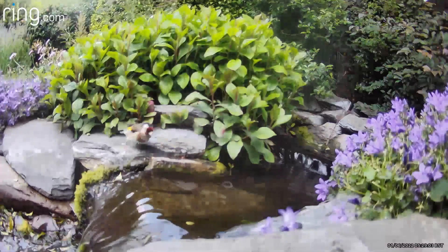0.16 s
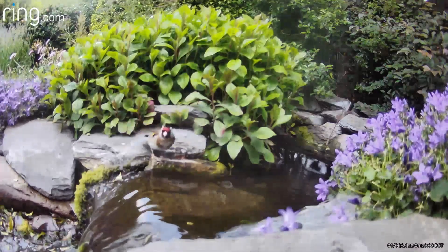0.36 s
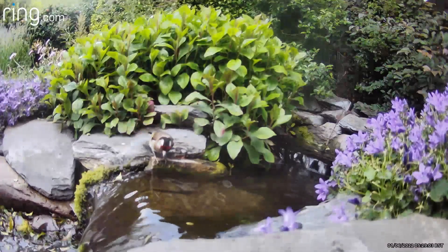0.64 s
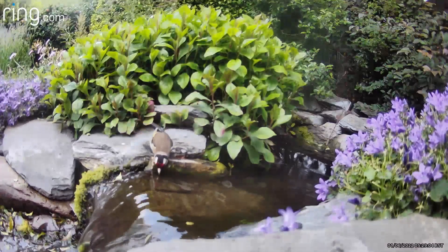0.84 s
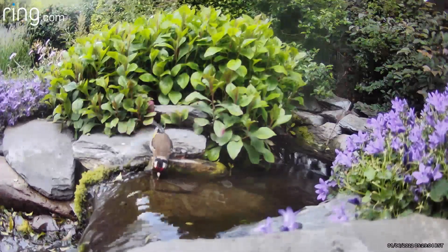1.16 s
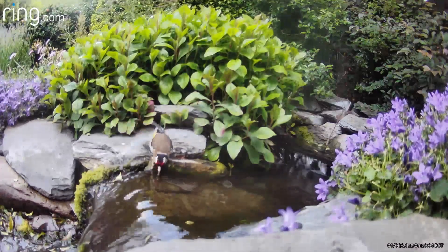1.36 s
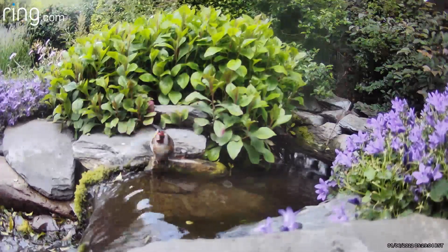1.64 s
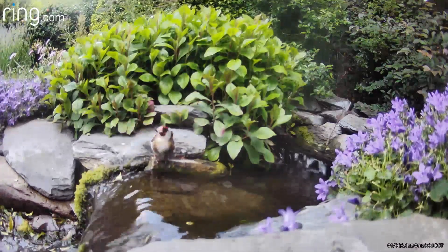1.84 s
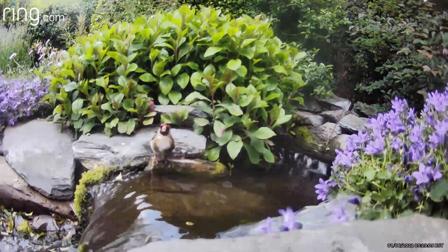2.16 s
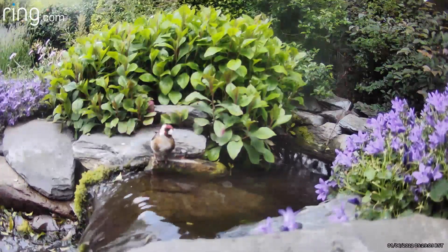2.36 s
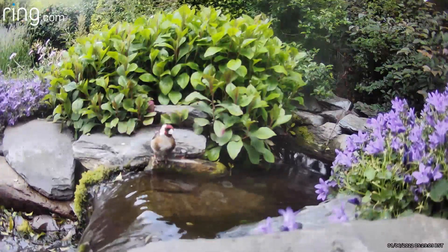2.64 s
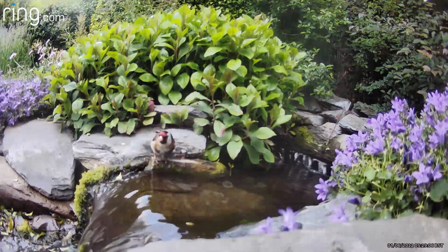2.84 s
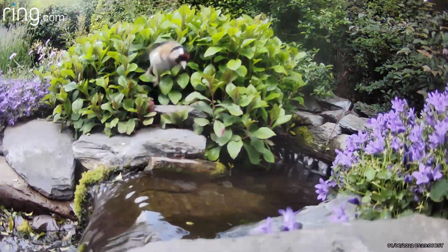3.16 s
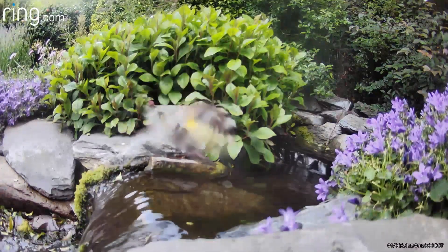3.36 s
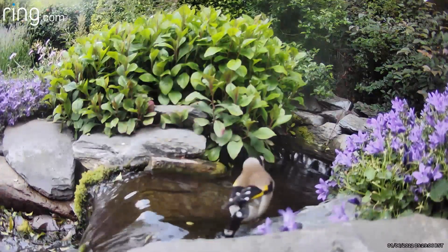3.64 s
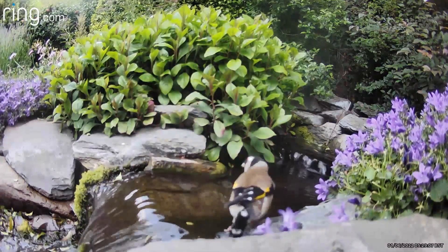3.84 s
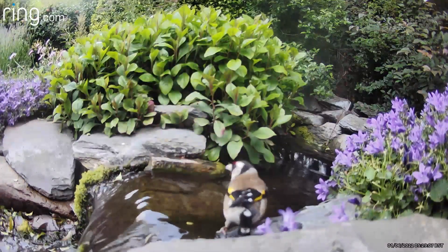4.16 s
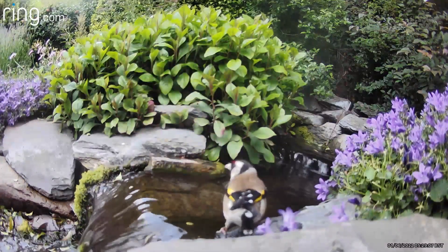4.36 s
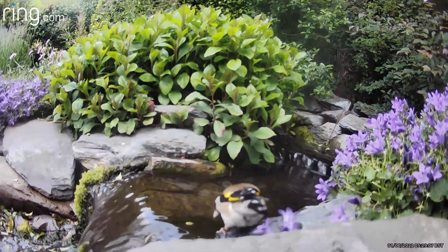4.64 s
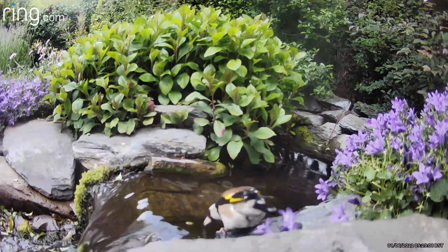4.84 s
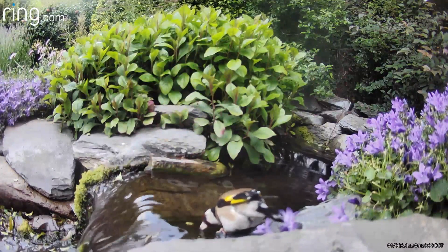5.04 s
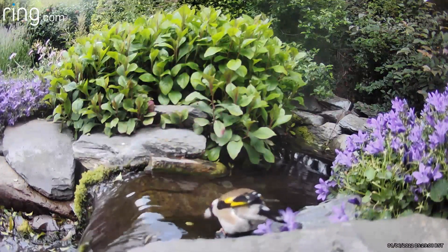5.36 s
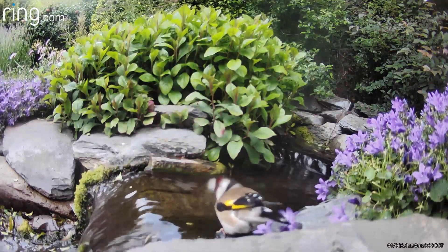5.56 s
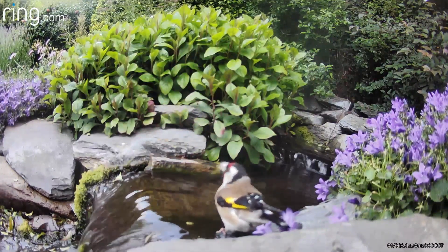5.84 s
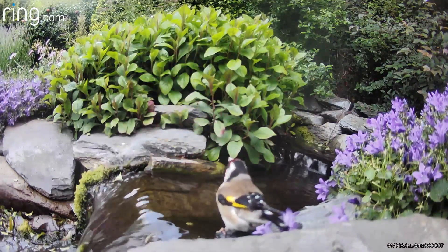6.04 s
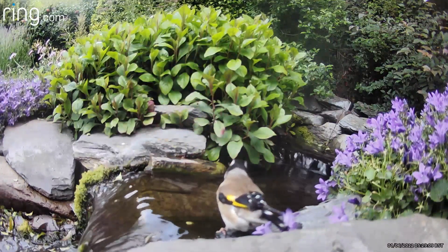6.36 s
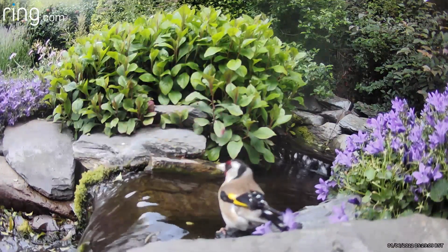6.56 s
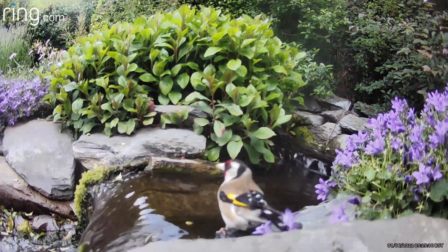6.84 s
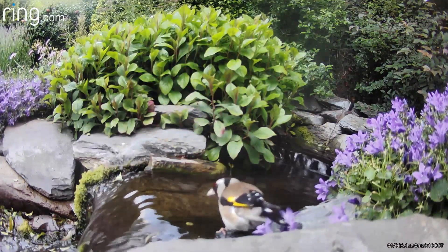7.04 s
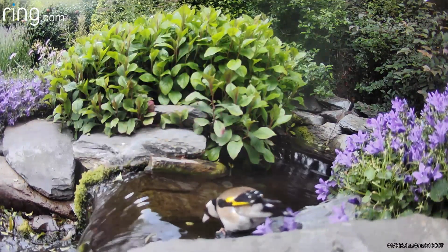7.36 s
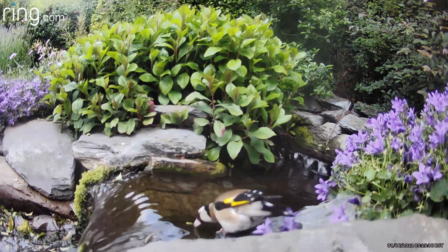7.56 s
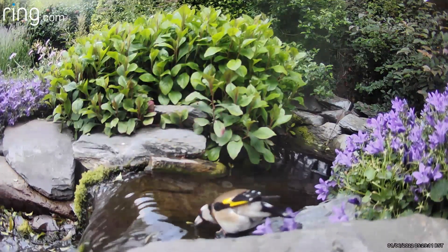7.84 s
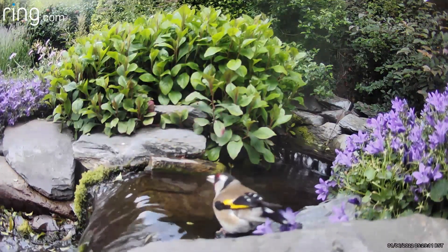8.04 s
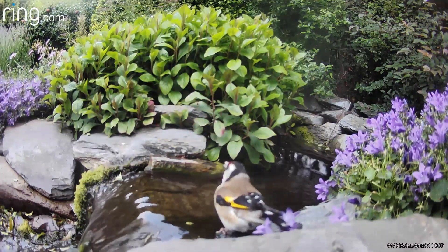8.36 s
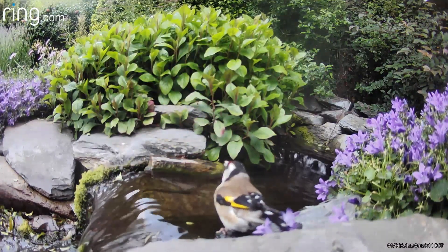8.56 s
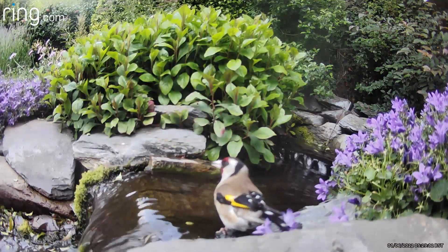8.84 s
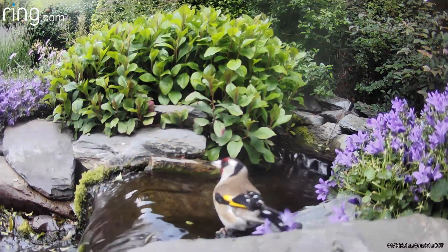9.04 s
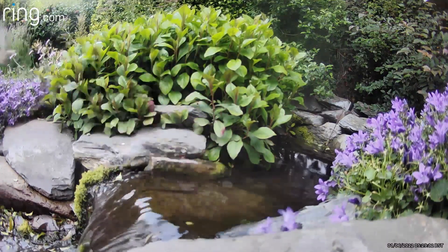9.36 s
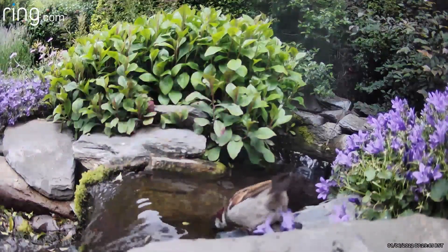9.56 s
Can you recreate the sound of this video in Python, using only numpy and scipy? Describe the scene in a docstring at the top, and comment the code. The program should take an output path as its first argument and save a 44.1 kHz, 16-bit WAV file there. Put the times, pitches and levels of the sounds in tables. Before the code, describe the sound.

Water gushes over stones into a small garden pond, bright and splashy with ringing bubbles; this is the loudest moment. By about 0.5 seconds it settles into a much quieter, steady trickle, a patter of small bubbles and fine spray with irregular plinking drops standing out. A pump hums very faintly underneath. Short, faint, high peeps mix with the drops, around 1 second, between 5 and 6 seconds and again near 7. At about 3.3 seconds a small bird flies in with a few soft, low wing thumps. A second, slightly stronger flutter comes from 9.2 to 9.5 seconds. Just before 9.5 seconds the water cuts off abruptly into a brief hiss, followed by quieter air and a few tiny, crisp rustles of a bird very close to the microphone, ending at about 9.7 seconds.

```python
"""Water gushes over stones into a small garden pond, each trapped air bubble ringing for a moment.
Within half a second it settles to a patter of bubbles, splashing drops and short peeps, over the hum
of the pump. Small birds fly in with soft thumps of their wings, after about 3 seconds and again after 9.
Then the pond cuts off, leaving a brief loud hiss, quiet air and a few close rustles."""
import sys
import numpy as np
from scipy import signal
from scipy.fft import rfft, irfft, next_fast_len
from scipy.io import wavfile
from scipy.ndimage import uniform_filter1d, map_coordinates

SR = 44100
rng = np.random.default_rng(int(sys.argv[2]) if len(sys.argv) > 2 else 0)


def put_to_file(sound):
    """Save the sound as 16-bit audio at rate SR, in the file named by the first command-line argument."""
    columns = np.atleast_2d(sound).T  # one column per channel
    safe = np.clip(columns, -1, 1)
    whole_steps = np.round(safe * 32767)
    wavfile.write(sys.argv[1], SR, whole_steps.astype(np.int16))


N = 427329

# Drops loud enough to stand out: peak_s, peak_db, pitch_hz, width_cycles, splash_db
DROPS = [(0.003, -25, 2320, 5.7, -51), (0.01, -20.5, 4630, 4, -39), (0.0191, -16.5, 4830, 3.6, -39),
         (0.046, -33, 4020, 3, -46), (0.068, -23.5, 2380, 6, -44), (0.0687, -22, 4460, 7.4, -40.5),
         (0.092, -21.5, 5960, 3.9, -32.5), (0.1089, -27, 2070, 7.3, -35.5), (0.118, -24.5, 4140, 10.5, -40),
         (0.129, -21.5, 5780, 9.2, -41), (0.1536, -26, 1860, 3.3, -37.5), (0.1664, -19.5, 5100, 6.6, -52),
         (0.2214, -22, 2200, 2.2, -38), (0.2353, -27, 2000, 3.6, -36.5), (0.236, -27, 2950, 8.3, -41),
         (0.246, -31, 900, 3.3, -45), (0.2678, -28, 5380, 13, -34.5), (0.3049, -28, 3100, 4.1, -39),
         (0.311, -35, 730, 3.7, -53), (0.3383, -26, 1580, 2.3, -44), (0.3514, -28.5, 940, 4.9, -58),
         (0.3594, -28, 1340, 4.1, -50), (0.3783, -34.5, 2130, 10, -50), (0.447, -31.5, 2550, 5.1, -43),
         (0.505, -41.5, 790, 3.3, -51.5), (0.795, -37, 4970, 3, -62), (0.8494, -49, 726, 4.6, -57),
         (0.881, -36.5, 3830, 4.1, -50.5), (0.9545, -28, 3900, 3.2, -54), (1.0, -42, 1950, 4, -55),
         (1.085, -49, 4300, 4, -59), (1.2013, -32.5, 4180, 2.9, -49), (1.218, -34.5, 4270, 6.1, -53),
         (1.357, -36.5, 3820, 7.3, -54), (1.361, -37, 4960, 6.4, -61), (1.6585, -32.5, 7100, 2, -57),
         (1.888, -42, 3170, 2.6, -64), (2.146, -40, 5740, 6.5, -51), (2.158, -41, 2900, 3, -48),
         (2.187, -35.5, 4020, 5.4, -62), (2.2547, -39, 2300, 6.2, -52), (2.309, -34, 4500, 2.4, -62),
         (2.3949, -31.5, 2720, 3.7, -52), (2.432, -31.5, 4700, 3.4, -55), (2.4374, -35, 4250, 7.9, -49),
         (2.4487, -35, 4900, 7.6, -61), (2.47, -40, 2380, 11, -58), (2.471, -36, 4820, 7.5, -67),
         (2.5346, -32.5, 4500, 3, -60), (2.555, -35, 3900, 4.3, -54), (2.62, -30.5, 3380, 3, -44.5),
         (2.8346, -47, 1300, 3.0, -57), (2.862, -40.5, 4700, 9.2, -64), (2.9825, -36, 4220, 6.2, -53),
         (3.066, -30.5, 4080, 3.4, -48.5), (3.139, -44, 2780, 4, -62), (3.22, -50, 920, 2.3, -60),
         (3.27, -47, 4300, 4, -44), (3.3055, -29, 2460, 3.7, -50), (3.308, -29, 4600, 3.3, -55.5),
         (3.548, -43, 4430, 3, -49.5), (3.578, -38, 2600, 4, -57), (3.7767, -36, 1770, 5.6, -48),
         (3.9983, -37.5, 1840, 2.9, -54), (4.0346, -32.5, 6400, 4.5, -60), (4.1397, -31.5, 4580, 13, -45.5),
         (4.157, -46, 3680, 7.9, -46), (4.335, -46, 4460, 4, -46.5), (4.379, -42, 2400, 4, -57),
         (4.418, -31, 4470, 5, -55), (4.4453, -48, 870, 3.3, -57), (4.5495, -31.5, 3980, 2.8, -62),
         (4.5772, -25.5, 4030, 1.7, -61), (4.5928, -48, 760, 5, -56), (4.594, -36.5, 5740, 5.4, -61),
         (4.84, -38, 4600, 4, -49.5), (4.8666, -26.5, 4000, 4.5, -64), (4.9252, -35.5, 4480, 5.8, -49),
         (4.9906, -27.5, 4520, 3.3, -60), (5.0091, -37, 4360, 5.9, -66), (5.073, -38, 1000, 2.4, -53),
         (5.123, -31, 4240, 3.1, -52), (5.215, -48, 533, 1.6, -68), (5.2796, -25, 4960, 4.4, -58),
         (5.475, -42, 2940, 4, -54), (5.5196, -30.5, 2400, 3.3, -60), (5.62, -40, 2700, 3.6, -55),
         (5.665, -39, 2400, 4, -56), (5.775, -40, 3540, 4, -56), (5.899, -38, 3800, 4.8, -48.5),
         (5.998, -29.5, 3850, 3.2, -45), (6.0616, -34.5, 2500, 5, -49), (6.0985, -27.5, 3660, 1.2, -46.5),
         (6.155, -36, 6600, 6.1, -52), (6.27, -40, 2960, 4, -60), (6.3248, -51, 716, 5.1, -55),
         (6.5, -40.5, 3020, 2.5, -61), (6.606, -41, 5630, 3, -42), (6.69, -41, 2800, 5, -53),
         (6.7795, -30.5, 4480, 1.8, -48), (6.795, -40, 4200, 8.7, -43), (6.8205, -40, 4840, 4.4, -64),
         (6.848, -32.5, 3980, 2.6, -59), (6.885, -30.5, 4340, 3.2, -57), (7.014, -39.5, 2700, 2.2, -63),
         (7.069, -39, 1500, 1.5, -46), (7.202, -26.5, 3800, 2.5, -51), (7.375, -38.5, 1060, 1.25, -64),
         (7.616, -32.5, 3420, 6.4, -51), (7.709, -39, 6900, 6.1, -61), (7.77, -38, 2670, 2.5, -51),
         (7.852, -46, 3970, 3, -44.5), (7.914, -41, 2630, 4.5, -50), (7.9478, -31.5, 4630, 5.3, -54),
         (8.1049, -46.5, 985, 5.1, -59), (8.217, -36.5, 3855, 5.6, -62), (8.2368, -36.5, 5430, 9, -49),
         (8.2566, -31.5, 5840, 5.4, -58), (8.273, -40, 1900, 2, -50), (8.2997, -22.5, 3500, 3.1, -50),
         (8.347, -37, 4640, 5, -47.5), (8.414, -32.5, 3920, 5.4, -48), (8.4215, -36, 3800, 4, -60),
         (8.4402, -32.5, 2200, 1.3, -51), (8.683, -37, 4730, 10, -58), (8.8105, -32.5, 5200, 4.1, -47.5),
         (8.8836, -36, 2370, 4.3, -57), (8.892, -49, 740, 3.7, -76), (8.9378, -32.5, 2880, 3, -47.5),
         (8.9705, -25, 5090, 4.5, -43), (9.0091, -36, 1590, 2.9, -48.5), (9.017, -37, 2210, 3, -57),
         (9.069, -40, 4300, 3, -57), (9.09, -39, 4670, 4, -60), (9.107, -40, 4030, 4, -46),
         (9.13, -51, 850, 3.5, -59), (9.293, -46, 840, 1.9, -56), (9.306, -29.5, 5200, 3.9, -45.5),
         (9.336, -26, 3920, 3.3, -51), (9.389, -40, 3750, 18, -47.5)]


def amp(db):
    """Turn decibels into a gain."""
    return 10 ** (np.asarray(db) / 20)


def unit(x):
    """Scale a sound to an average power of 1."""
    return x / np.sqrt(np.mean(x ** 2) + 1e-20)


def curves(rows):
    """Join the rows of a table with lines: one curve for each column after the time."""
    times, *columns = np.transpose(rows)
    return [np.interp(np.arange(N) / SR, times, column) for column in columns]


def wobble(rate):
    """A smooth curve through `rate` random points a second."""
    points = rng.standard_normal(int(N * rate / SR) + 4)
    return map_coordinates(points, [np.arange(N) * rate / SR])


def filtered(x, response):
    """Turn each frequency up or down by the gain response(hz)."""
    size = next_fast_len(N + 8192)
    return irfft(rfft(x, size) * response(np.fft.rfftfreq(size, 1 / SR)), size)[..., :N]


def noise(spectrum, patchy_db):
    """Noise with the given tone, made louder and softer in random patches of time and pitch."""
    grid = signal.stft(rng.standard_normal(N), nperseg=256)[2]
    patches = uniform_filter1d(rng.standard_normal(grid.shape), size=5, axis=0)
    patches = uniform_filter1d(patches, size=7, axis=1)
    patchy = signal.istft(grid * amp(patchy_db * unit(patches)), nperseg=256)[1][:N]
    band_hz, db = np.transpose(spectrum)
    return unit(filtered(patchy, lambda hz: amp(np.interp(np.log(hz + 1), np.log(band_hz), db))))


def bubbles(peak_s, gain, hz, cycles, rise, size, swell=0.3, fade=0.42):
    """Short tones that swell and fade; `rise` lifts the pitch, as when a bubble nears the surface."""
    lead = size // 4
    u = (np.arange(size) - lead) / SR * (hz / cycles)[:, None]  # time from the peak, in widths
    shape = np.where(u < 0, amp(-6 * (u / swell) ** 2), amp(-6 * (np.abs(u) / fade) ** 1.1))
    phase = 2 * np.pi * cycles[:, None] * (u + rise * u * np.abs(u) / 2)
    wave = gain[:, None] * shape * np.sin(phase)
    at = np.round(peak_s * SR).astype(int)[:, None] + np.arange(size)
    return np.bincount(at.ravel(), wave.ravel(), N + 2 * size)[lead:][:N]


def stones(x, fade_s, echo_db, count=24):
    """Rocks round the pond scatter the sound into a short echo, a new one for each stretch of time."""
    t = np.arange(SR // 10) / SR
    tails = rng.standard_normal((count, len(t))) * amp(-60 * t / fade_s)
    parts = np.pad(x, (0, -N % count)).reshape(count, -1)
    echoes = signal.fftconvolve(parts, tails / np.linalg.norm(tails, axis=1)[:, None], axes=1)
    at = np.arange(count)[:, None] * parts.shape[1] + np.arange(echoes.shape[1])
    return x + amp(echo_db) * np.bincount(at.ravel(), echoes.ravel())[:N]


def pump():
    """The pump gives an unsteady electric hum over a dull rumble."""
    # Loudness of the pump: time_s, level_db
    loudness = [(0.0, -90), (0.13, -105), (0.5, -80.5), (0.8, -74), (1.7, -77), (3.0, -80), (3.5, -82),
                (4.4, -80.5), (4.9, -78), (5.3, -79.5), (7.4, -80.5), (8.2, -79.5), (9.0, -79.5),
                (9.47, -76)]
    # Tones of the hum: pitch_hz, relative_db
    tones = [(100, 0.5), (150, -4.5)]
    # Tone of the rumble: frequency_hz, relative_db
    rumble_tone = [(12, -52), (20, -16), (48, -16), (91, -9.5), (193, -6.5), (279, -4.5), (420, -2),
                   (550, -30), (920, -120)]
    level_db, = curves(loudness)
    t = np.arange(N) / SR
    hum = np.zeros(N)
    for hz, db in tones:
        gain = amp(db + 1.3 * wobble(4.9) + 2.2 * wobble(40))
        hum += gain * np.sin(2 * np.pi * hz * t + .3 * wobble(6.5))
    rumble = amp(4.5 + 1.3 * wobble(7)) * noise(rumble_tone, patchy_db=3.0)
    return amp(level_db) * (hum + rumble)


def close_air():
    """Air hisses and a bird rustles very close by, in tiny bright crackles."""
    # Loudness of the hiss: time_s, level_db
    loudness = [(9.43, -48.5), (9.468, -46.5), (9.48, -62.5), (9.642, -61.5), (9.648, -52.5),
                (9.654, -59.5), (9.69, -55)]
    # Tone of the hiss: frequency_hz, relative_db
    hiss_tone = [(15, -30), (25, -3), (94, -10), (153, -5), (242, -16), (300, -7), (773, -8.5), (5120, -6),
                 (7890, -4), (15900, -11.5)]
    # The bird's rustles: start_s, level_db, pitch_hz
    rustles = [(9.44, -41, 7600), (9.613, -55, 7700), (9.628, -52.5, 9900), (9.647, -40, 2680),
               (9.677, -38.5, 9600)]
    level_db, = curves(loudness)
    out = amp(level_db + 2.1 * wobble(60)) * noise(hiss_tone, patchy_db=-3.5)
    t = np.arange(SR // 50) / SR
    for start_s, db, hz in rustles:
        crackle = np.diff(rng.standard_normal(len(t) + 1)) / 2 + np.sin(2 * np.pi * hz * t)
        burst = amp(db - 60 * t / 0.0053) * crackle
        start = round(start_s * SR)
        out[start:][:len(t)] += burst[:N - start]
    return out


def wings():
    """Each wing beat is a soft, low push of air with a puff of feather noise."""
    # Wing beats: peak_s, peak_db, pitch_hz
    beats = [(3.316, -64, 315), (3.365, -62, 194), (3.415, -60, 330), (3.44, -67, 45), (9.216, -60, 148),
             (9.274, -60, 53.8), (9.297, -50.5, 318), (9.336, -53, 218), (9.385, -72, 310),
             (9.437, -65, 203), (9.456, -68, 35.0)]
    # Tone of the feather noise: frequency_hz, relative_db
    feather_tone = [(20, -8), (60, -3), (300, 3), (500, -4), (1000, -62)]
    puff_db, puff_s = -8.5, 0.013  # level against the push, width
    peak_s, db, hz = np.transpose(beats)
    t = np.arange(N) / SR
    pushes = bubbles(peak_s, amp(db), hz, cycles=0.39 + hz * 0.0061, rise=0, size=8000)
    puffs = sum(amp(level + puff_db) * np.exp(-((t - at) / puff_s) ** 2) for at, level in zip(peak_s, db))
    return pushes + puffs * noise(feather_tone, patchy_db=3.5)


def peeps():
    """Short, rough peeps among the drops: soft-edged tones that waver and slide a little."""
    # Peeps: middle_s, level_db, pitch_hz, length_s, glide_hz
    notes = [(0.376, -49, 2100, .014, 101), (0.972, -51, 4600, 0.038, -5), (1.092, -50, 5360, 0.022, 102),
             (1.145, -48, 2390, 0.0087, 0), (1.665, -52, 4830, 0.021, 89), (5.087, -43.5, 5380, 0.032, 150),
             (5.287, -47.5, 5970, 0.024, 10), (5.358, -43, 5040, 0.02, 120), (5.596, -55, 5840, 0.044, 3),
             (5.672, -54.5, 4820, 0.024, -1), (6.781, -57, 5760, 0.017, 6), (7.215, -52, 4740, 0.016, -8),
             (7.268, -54, 5230, 0.023, -2), (7.348, -50.5, 2380, 0.047, 0), (7.922, -54, 2500, 0.026, -3),
             (9.224, -60.5, 527, 0.041, 59), (9.398, -51, 4190, 0.019, 397)]
    out = np.zeros(N)
    for middle_s, db, hz, length_s, glide_hz in notes:
        u = np.linspace(-1, 1, round(2 * length_s * SR))
        waver_hz = 90 * unit(uniform_filter1d(rng.standard_normal(len(u)), size=90))
        phase = 2 * np.pi * np.cumsum(hz + glide_hz * u + waver_hz) / SR
        out[round((middle_s - length_s) * SR):][:len(u)] += amp(db) * np.exp(-(2 * u) ** 4) * np.sin(phase)
    out *= amp(3.3 * wobble(300))  # the tone flutters
    return stones(out, fade_s=0.032, echo_db=-2.5)


def spray(small_db):
    """A fine spray hisses high up, following the level of the small bubbles."""
    # Tone of the spray: frequency_hz, relative_db
    spray_tone = [(4500, -40), (6000, -6.5), (7200, -3), (8200, -9), (8600, -60.5)]
    return amp(uniform_filter1d(small_db, size=3000) - 19) * noise(spray_tone, patchy_db=7.0)


def spatter(small_db):
    """Droplets hit wet stone, 220 a second: ticks too short to have a clear pitch."""
    when, strength, pitch = rng.random((int(220 * N / SR), 3)).T
    gain = amp(np.minimum(-4.5 * np.log(strength + 1e-9), 11))
    ticks = bubbles(when * N / SR, gain, 1800 + 3500 * pitch, np.full(len(when), 1.1), rise=0, size=200)
    level_db = np.minimum(small_db + 2, -48)  # even the gush throws no harder droplets
    return amp(level_db) * stones(ticks, fade_s=0.016, echo_db=-3.5)


def splash_power(hz):
    """How strongly the loud drops stir up bubbles near this pitch: suddenly, then dying away."""
    rise_s, fade_s, stir_db = 0.028, 0.27, -3.6
    lead_s = 0.0047  # the water stirs just ahead of the loud bubble
    peak_s, _, pitch_hz, _, splash_db = np.transpose(DROPS)
    nearness = np.exp(-(np.log(pitch_hz / hz) / 0.71) ** 2)
    starts = np.round(np.maximum(peak_s - lead_s, 0) * SR).astype(int)
    kicks = np.bincount(starts, nearness * amp(splash_db + stir_db) ** 2, N)
    t = np.arange(SR // 4) / SR
    shape = (1 - np.exp(-t / rise_s)) * amp(-60 * t / fade_s)
    return np.abs(signal.fftconvolve(kicks, shape ** 2)[:N])


def patter(hz, spread, rate, extra_cycles, swarm_db, spectrum):
    """Bubbles of one size: a few loud, many faint, over a wash of those too dense to tell apart."""
    when, strength, ring, tuning = rng.random((int(rate * N / SR), 4)).T
    pitch_hz = hz * np.exp(spread * (2 * tuning - 1))
    band_hz, db = np.transpose(spectrum)
    tone_db = np.interp(np.log(pitch_hz), np.log(band_hz), db)
    gain = amp(np.minimum(-5.5 * np.log(strength + 1e-9), 14) + tone_db)
    cycles = 1.87 + extra_cycles * ring ** 4  # most die fast, a few ring on
    swarm = bubbles(when * N / SR, gain, pitch_hz, cycles, rise=.05, size=int(40 * SR / hz))
    swarm = amp(swarm_db) * unit(stones(swarm, fade_s=0.05, echo_db=-1.5))
    wash = noise(spectrum, patchy_db=3.0)
    return unit((swarm + wash) * amp(1.93 * wobble(45)))


def trickle():
    """Running water makes three sizes of bubble, which swell with the flow and with each splash."""
    # Steady flow by bubble size: time_s, large_db, middle_db, small_db
    flow = [(0.0, -80, -33, -41), (0.03, -73, -34.5, -35), (0.058, -69, -39, -41),
            (0.075, -69, -32.5, -32.5), (0.12, -65, -34.5, -40), (0.14, -59, -38, -45),
            (0.156, -58, -34, -30.5), (0.18, -52, -42, -43), (0.215, -51.5, -37.5, -36),
            (0.24, -51, -42, -34.5), (0.258, -60, -49, -38.5), (0.29, -44, -35.5, -36),
            (0.35, -52, -40.5, -39.5), (0.41, -61, -45.5, -52), (0.56, -62, -57, -57.5),
            (0.86, -56.5, -58, -57.5), (1.02, -67, -56, -56.5), (1.39, -63, -62, -53),
            (1.46, -66.5, -64, -64.5), (1.6, -61.5, -63, -55.5), (1.64, -63, -67, -59.5),
            (1.8, -62.5, -60.5, -59.5), (1.9, -59.5, -57.5, -59), (2.16, -67, -62.5, -55.5),
            (2.22, -67.5, -62.5, -55.5), (2.6, -65.5, -52, -54.5), (2.72, -62, -59, -59),
            (2.8, -66, -53, -57), (3.0, -66, -64.5, -55), (3.28, -60, -54, -53), (3.7, -65.5, -60, -60.5),
            (4.1, -66, -55, -53.5), (4.28, -68.5, -60.5, -56.5), (4.45, -62.5, -52, -54.5),
            (4.7, -66, -58, -59), (5.4, -64.5, -56, -53.5), (5.9, -66, -59, -59), (6.22, -65.5, -58, -55),
            (6.55, -66, -57, -59), (7.0, -65.5, -60.5, -57.5), (7.36, -69.5, -58, -55.5),
            (7.5, -67.5, -57.5, -59), (7.76, -66.5, -57.5, -55.5), (7.84, -74, -56.5, -59),
            (7.9, -65, -56, -55), (8.75, -65.5, -59, -58.5), (9.47, -69, -60.5, -60)]
    # Large, middle, small bubbles: pitch_hz, log_pitch_spread, bubbles_per_s, extra_cycles, swarm_db
    sizes = [(749, 0.55, 500, 3.5, -2), (2170, 0.52, 700, 5.7, 0), (4574, 0.344, 1000, 15, 1)]
    # Tone of each size: frequency_hz, relative_db
    large = [(150, -44.5), (250, -19), (537, -0.5), (619, -7.5), (741, -2), (1140, -5.5), (1380, 0.5),
             (1500, -12), (1950, -24.5), (3300, -120)]
    middle = [(590, -43), (1000, -16.5), (1380, -2), (1940, -1.5), (2360, 2), (2780, -1.5), (3600, -10.5),
              (4680, -15.5), (7920, -120)]
    small = [(1710, -48), (2900, -1), (4810, 3.5), (5840, 0), (6750, -6.5), (7700, -24), (8080, -30),
             (8300, -36.5), (10800, -57), (18300, -120)]
    ebb_db = 0.64 * wobble(16)  # uneven flow, shared by all sizes
    levels_db = []
    for db, size in zip(curves(flow), sizes):
        flow_power = amp(db + ebb_db + 0.88 * wobble(11)) ** 2
        levels_db.append(10 * np.log10(flow_power + splash_power(hz=size[0])))
    bubbling = sum(amp(db) * patter(*size, tone)
                   for db, size, tone in zip(levels_db, sizes, (large, middle, small)))
    return bubbling + spray(levels_db[2]) + spatter(levels_db[2])


def bubble_clusters(count):
    """Every loud drop breaks into a cluster of small bubbles near its own pitch."""
    lead_s, mean_delay_s = .008, .027  # the first come just ahead of the loud bubble
    peak_s, _, hz, _, splash_db = np.transpose(DROPS)[:, :, None]
    draw = rng.random((len(DROPS), 2, count))
    scatter = rng.standard_normal((len(DROPS), 2, count))
    at_s = np.clip(peak_s - lead_s - mean_delay_s * np.log(draw[:, 0] + 0.0011), 0, N / SR)
    pitch_hz = hz * np.exp(.22 * scatter[:, 0])
    top_hz = np.maximum(hz, 5900)
    pitch_hz = np.minimum(pitch_hz, top_hz * top_hz / pitch_hz)  # too-high pitches fold back down
    ring = np.sqrt(np.minimum(pitch_hz / 2170, 1))  # low bubbles are fainter and die in fewer cycles
    gain = amp(splash_db + 1 + 3.05 * scatter[:, 1]) * ring
    cycles = (1.7 + 3 * draw[:, 1] ** 3) * ring
    return bubbles(at_s.ravel(), gain.ravel(), pitch_hz.ravel(), cycles.ravel(), rise=0.025, size=1200)


def drops():
    """A drop hits the water with a snap, then one loud bubble rings among smaller ones."""
    peak_s, db, hz, cycles, _ = np.transpose(DROPS)
    snaps = bubbles(peak_s - .0006, amp(db - 12.5), hz, cycles=np.full(len(hz), .8), rise=0, size=200)
    plinks = bubbles(peak_s, amp(db), hz, np.clip(cycles, 1.2, 18), rise=0.016, size=2400, swell=0.4)
    return stones(snaps + plinks + bubble_clusters(count=28), fade_s=0.053, echo_db=-4.0)


def scene():
    """Mix the pond and the birds; near the end the pond gives way to hiss. Both channels are alike."""
    water_low_hz, pond_top_hz, cut_s = 284, 7997, 9.435
    t = np.arange(N) / SR
    water = filtered(trickle() + drops() + peeps(), lambda hz: 1 / (1 + (water_low_hz / (hz + 1)) ** 8))
    pond = filtered(water + pump(), lambda hz: 1 / (1 + (hz / pond_top_hz) ** 150))
    pond_on = np.clip((cut_s + 0.036 - t) / 0.0069, 0, 1)
    air_on = np.clip((t - cut_s) / 0.0033, 0, 1)
    mono = pond * pond_on + wings() + close_air() * air_on + amp(-100) * rng.standard_normal(N)
    return np.array([mono, mono])


def record(dry):
    """Remove the very highest treble."""
    return filtered(dry, lambda hz: hz < 16075)


dry = scene()
out = record(dry)
put_to_file(out)
```